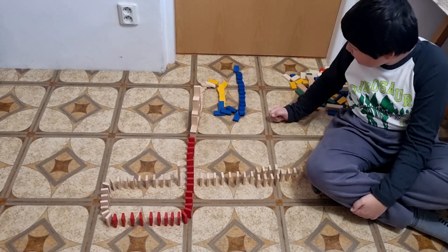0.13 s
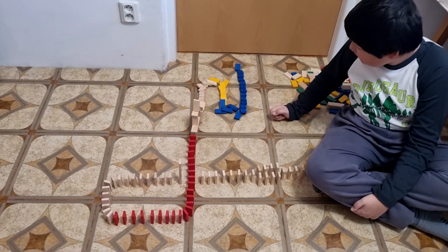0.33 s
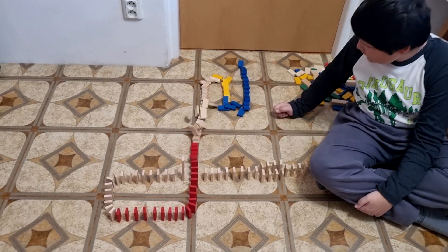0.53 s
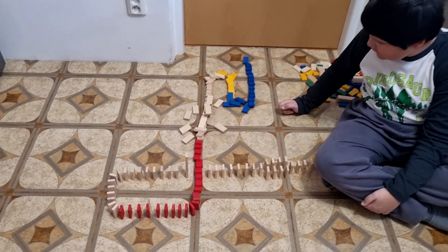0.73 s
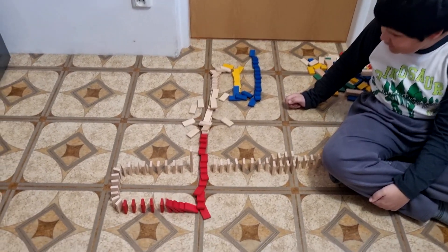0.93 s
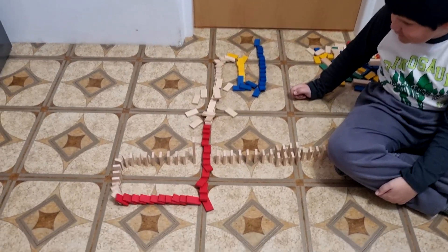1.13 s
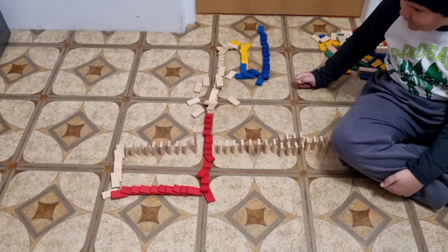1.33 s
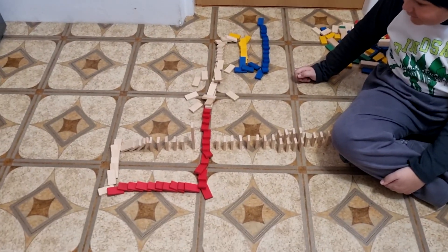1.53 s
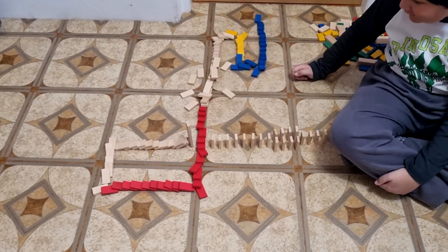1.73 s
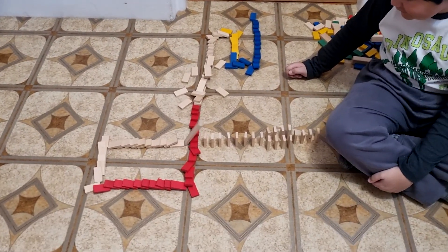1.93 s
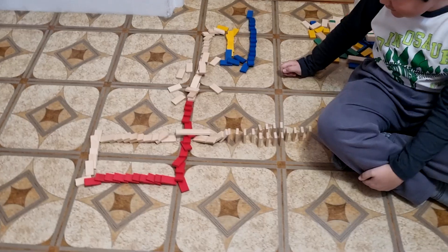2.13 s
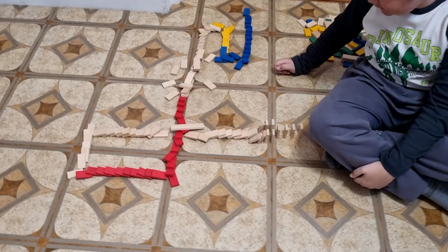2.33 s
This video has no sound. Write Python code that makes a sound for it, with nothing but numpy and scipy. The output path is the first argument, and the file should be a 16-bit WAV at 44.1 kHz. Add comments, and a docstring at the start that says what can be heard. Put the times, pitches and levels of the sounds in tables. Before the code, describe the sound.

Wooden dominoes fall in a fast, uneven clatter on a tiled floor; light ticks, a loud collapse near half a second, then softer clicks thinning out. Small hard room, stereo microphones above, faint low hush.

```python
"""A running clatter follows a chain of wooden dominoes toppling across a tiled floor in a small, hard room.
A stack collapses early on; single pieces slap the tiles, rattle and now and then ring freely.
Each contact is a noise crack with tiny bounces, filtered by the modes of a piece; free rings are dying sines.
A gliding resonator makes the floor boom and decaying noise makes the room, over a quiet, low hush.
Two spaced microphones hear it from above."""
import sys
import numpy as np
from scipy import signal
from scipy.fft import rfft, irfft
from scipy.io import wavfile

SR = 44100
rng = np.random.default_rng(int(sys.argv[2]) if len(sys.argv) > 2 else 0)


def bounce(signal):
    """Save signal as a 16-bit WAV file at the path given by the first command-line argument."""
    frames = np.transpose(np.atleast_2d(signal))
    limited = np.clip(frames, -1, 1)
    pcm = np.round(limited * 32767).astype(np.int16)
    wavfile.write(sys.argv[1], SR, pcm)


N = 109323
LEAD_IN_S = 0.1  # rendered ahead of the output, then cut
SIZE = 4096  # samples
T, HZ = np.arange(SIZE) / SR, np.fft.rfftfreq(SIZE, 1 / SR)
MIC_GAP_M, SOUND_M_PER_S = 0.28, 343

# Bending modes of a piece. Each row: frequency in Hz, t60 in s, level in dB in an ordinary contact.
PIECE_MODES = [(2812,.13,-30),(6850,.018,-20),(12100,.03,-19)]


def amp(db):
    """Decibels to gain."""
    return 10 ** (np.asarray(db) / 20)


def unit(x):
    """Scales to energy 1."""
    return x / np.sqrt(np.sum(x ** 2, -1, keepdims=True) + 1e-20)


def read(points, hz):
    """Reads a table on a log-frequency axis."""
    f, value = np.transpose(points)
    return np.interp(np.log(hz + 1), np.log(f + 1), value)


def add(mix, s, sound):
    """Adds a sound at time s."""
    start = max(round(s * SR), 0)
    part = mix[..., start:][..., :sound.shape[-1]]
    part += sound[..., :part.shape[-1]]


def colour(x, db):
    """Causal minimum-phase filter with the given gain in dB at each frequency of HZ."""
    log_gain = np.log(amp(np.r_[db, db[-2:0:-1]]))
    min_phase = np.exp(np.conj(signal.hilbert(log_gain)))
    taps = np.fft.ifft(min_phase).real
    return signal.oaconvolve(x, taps[:SIZE // 2])[:len(x)]


def mode(hz, t60_s, t=T):
    """A dying sine of energy 1."""
    return unit(np.sin(2 * np.pi * hz * t) * np.exp(-np.log(1000) * t / t60_s))


def contact(s, db, thud_db, knock_db, clack_db, treble_db, rattle_db, room_db):
    """A crack and a run of tiny bounces excite one piece; how it lands sets the weight of each band."""
    # Centres of thud, knock, clack, click and treble in Hz.
    band_hz = (700, 2200, 3900, 6600, 11500)
    rise_s, crack_s, rattle_s = 0.00037, 0.00088, 0.0043  # time constants
    bounces_per_s, pitch_spread = 1600, 0.0424

    t = T[:SIZE // 4]
    crack_envelope = (1 - np.exp(-t / rise_s)) * np.exp(-t / crack_s)
    crack = unit(rng.standard_normal(len(t)) * crack_envelope)
    impulses = rng.standard_normal(len(t)) * (rng.random(len(t)) < bounces_per_s / SR)
    bounces = unit(impulses * np.exp(-t / rattle_s))
    blow = unit(crack + amp(rattle_db) * bounces)

    body = (t == 0).astype(float)  # the blow itself, then the modes
    pitches = 1 + pitch_spread * rng.standard_normal(len(PIECE_MODES))
    for (hz, t60_s, mode_db), pitch in zip(PIECE_MODES, pitches):
        body += amp(mode_db) * mode(hz * pitch, t60_s, t)

    bands = list(zip(band_hz, (thud_db, knock_db, clack_db, 0, treble_db)))
    spectrum = rfft(blow, SIZE) * rfft(body, SIZE) * amp(db + read(bands, HZ))
    return s, irfft(spectrum)[:SIZE // 2], room_db


def clatter(count=340, scatter_db=2.0, rattle_db=1, room_db=1):
    """Each piece taps the next and slides down it: many soft contacts at uneven times."""
    # Course of the soft contacts. Each row: time in s, mean relative level in dB,
    # then thud, knock, clack and treble in dB against the click.
    course = [(0.0, -31.5, 5, 4.5, 6, -3), (0.25, -36, 12, -1, 5, -12), (0.38, -26.5, 6, 9, 7, 0),
              (0.459, -17.5, 4, -6, -9, -8), (0.52, -66, -2, 0, 3, -4), (0.58, -20, -12, -16, -4, -1),
              (0.68, -20.5, 9.5, 8.5, 1.5, -1.5), (0.8, -22, 0, 1, 0.5, -5.5), (0.88, -28, 8, 8, 2, 0.5),
              (1.0, -37, 0, 2, -5, -8), (1.08, -30, 5.5, -1, 6, -4), (1.17, -27, 6.5, 3.5, 4, -4),
              (1.25, -38.5, 10, 12, -1, -0.5), (1.35, -25.5, 1.5, -2, -4, -5.5), (1.43, -34, 7, 3, -2, -13),
              (1.5, -30.5, 7, 12.5, 5.5, -2), (1.6, -51, 16.5, -2, 12, 0), (1.68, -37.5, 9, 8, -2, 3),
              (1.74, -31, 1, 4, 2, -17), (1.86, -33.5, 6, -4, 1, -12), (1.92, -33, 12, 2.5, 1, 2),
              (1.96, -81, 13, 9, 2, -1), (2.093, -54.5, 24, 15, 11, -6), (2.11, -29.5, 4, 5, -3, -15),
              (2.25, -32, 11, 12, 6, -10.5), (2.36, -37.5, 11.5, 9.5, -9, -10),
              (2.48, -42, 4, 17, -3, -4.5)]
    position = (np.arange(count) + rng.random(count)) / count
    times = position * (N / SR + LEAD_IN_S) - LEAD_IN_S
    at, *columns = np.transpose(course)
    levels, *bands = [np.interp(times, at, column) for column in columns]
    levels = levels + scatter_db * rng.standard_normal(count)
    return [contact(*row, rattle_db, room_db) for row in zip(times, levels, *bands)]


def floor_boom(x):
    """The floor rings at a low pitch that changes as the front moves across it."""
    # Floor resonance. Each row: time in s, frequency in Hz, relative drive in dB.
    resonance = [(0,294,10),(.6,289,10),(.9,292,4),(1.2,311,6),(1.45,189,13.5),(1.7,200,13),(1.95,233.6,9),(2.12,235.5,18),(2.48,229,-3)]
    width_hz = 6.6
    at, *columns = np.transpose(resonance)
    t = np.arange(len(x)) / SR - LEAD_IN_S
    hz, db = [np.interp(t, at, column) for column in columns]
    turn = np.exp(2j * np.pi * np.cumsum(hz) / SR)
    r = np.exp(-np.pi * width_hz / SR)
    # shift the resonance to 0 Hz, smooth with one pole, shift back
    baseband = signal.lfilter([1 - r], [1, -r], amp(db) * x / turn)
    return 2 * (turn * baseband).real


def diffuse(z, hz):
    """Makes two spectra as alike as a diffuse field is at two spaced microphones."""
    same = np.sinc(2 * hz * MIC_GAP_M / SOUND_M_PER_S)
    return np.array([z[0], same * z[0] + np.sqrt(1 - same ** 2) * z[1]])


def room_response(delay_s=0.0013, early_s=0.0092, build_s=0.002, early_db=-3.5, taps_per_s=1000):
    """Early wall reflections and a dense tail whose decay time depends on frequency."""
    # Decay of the tail. Each row: frequency in Hz, t60 in s.
    decay = [(100,0.15),(300,0.42),(1000,0.48),(3500,0.38),(7000,0.36),(14000,0.29)]
    t = np.arange(SR // 2) / SR
    late = np.maximum(t - delay_s, 0)
    hz, at, z = signal.stft(rng.standard_normal((2, len(t))), SR, nperseg=256)
    t60_s = read(decay, hz)[:, None]
    z = diffuse(z, hz[:, None]) * np.exp(-np.log(1000) * at / t60_s)
    noise = signal.istft(z, SR)[1][:, :len(t)]
    tail = unit(noise * (1 - np.exp(-late / build_s)))
    taps = rng.standard_normal(tail.shape) * (rng.random(tail.shape) < taps_per_s / SR)
    early = unit(taps * (late > 0) * np.exp(-late / early_s))
    return tail + amp(early_db) * early


def hush(rms_db=-62.5):
    """Quiet, low room noise: shaped noise, diffuse between the microphones."""
    # Noise spectrum. Each row: frequency in Hz, relative level in dB.
    noise_colour = [(25,-23),(60,-21),(130,3.5),(250,-7),(600,-4.5),(2000,-15),(8000,-14),(16000,-57)]
    hz = np.fft.rfftfreq(N, 1 / SR)
    z = diffuse(rfft(rng.standard_normal((2, N))), hz) * amp(read(noise_colour, hz))
    return amp(rms_db) * np.sqrt(N) * unit(irfft(z, N))


def free_ring(s, pitch, *mode_db, room_db=-1):
    """A piece that bounces clear rings with its bending modes."""
    sound = np.zeros(SIZE)
    for (hz, t60_s, _), db in zip(PIECE_MODES, mode_db):
        sound += amp(db) * mode(hz * pitch, t60_s)
    return s, sound, room_db


def scene(path_count=5, direct_db=12, wet_db=13.5):
    """Contacts reach the microphones directly and by one of several paths through the room."""
    # Loud contacts. Each row: start in s, relative level in dB, thud, knock, clack and treble in dB
    # against the click, rattle in dB against the crack, relative room send in dB.
    hits = [(0.007, -32, -6, 16, 18.5, -9, -19, 0.5), (0.033, -27, -21, 4, -1.5, -11, 0, 2),
            (0.054, -22, -12, -4, -13, -16, 1, 8), (0.065, -26, -11, -5, -13, -11, 14, -2),
            (0.079, -19.5, -22, 1, 3, -11, 21, -5), (0.101, -22.5, 2.5, 1, -16, -10, -11, 6),
            (0.115, -22.5, -3, 10.5, 9, -9, -4, 1), (0.119, -20.5, 1, 10, 9, -10, -3, -11),
            (0.162, -16.5, 4, 5.5, 4.5, -13, -2.5, 0), (0.175, -29, 12, -2, 0, -14, -4, 5.5),
            (0.203, -21, -9, -9, 5.5, -13, 13, 4), (0.221, -28, 8.5, 8, 7.5, -13, 4, 7),
            (0.23, -28, 7, 4, 9, -15, -3, -8), (0.26, -29.5, 3, 14, 19.5, -13, -13, 3.5),
            (0.266, -30, 16.5, 9, 11, -2, 2, 5), (0.2897, -13, 11.5, 8.5, 2.5, -12, 10, 3),
            (0.294, -16, 14, 4, 1, -1, 8, -2), (0.302, -21, 18.5, 11, 10, -12, -4, 2.5),
            (0.347, -29, 17, 7, 13, -5, -15, -2), (0.376, -10, -10, -19, -1, -5.5, 5, 3.5),
            (0.388, -27, -20, -8, -6, 1, 3, 2), (0.4077, -3, -7, -7, -3, 3.5, 4, 3.5),
            (0.4117, -2, -2.5, -1, -15, -7, 2.5, 0.5), (0.4241, -1.5, -16, -14, -10, -5, 16, -5),
            (0.433, -7.5, 2, -21, -2, 7.5, 7.5, 1), (0.445, -5.5, -11, -4, -2, -15, -4, 1),
            (0.456, -6.5, -2, -1, -2.5, 0, 11, 1.5), (0.5473, -6, 0, -1, 9.5, -1.5, -4, 0),
            (0.553, -13.5, 0, -2, -13, -2, -7, 8.5), (0.5715, -8.5, -2.5, -3.5, -6, -2, -2, 4.5),
            (0.597, -5.5, -3.5, -9, 7, -1, 22, 1), (0.605, -8, -1, -2, -1, -4, 12, 4),
            (0.614, -7.5, 3.5, 4, 5, 0, -1, -1.5), (0.621, -9.5, 6, 2.5, -4, -2, 1, -0.5),
            (0.648, -12, 2, 1, 5, -3, -5, -4), (0.658, -28, 17, -9, 11, -5, -10, 7),
            (0.709, -14, 2.5, 5, 2, -4, -10, 5), (0.723, -15.5, 5, -1, 1, -1, 6, -3),
            (0.732, -15, 2, -6, -5, 0, -16, 2.5), (0.771, -21, 8, 6.5, 6, 0, 20, 7.5),
            (0.792, -22.5, -11, -6, 12, 4.5, -4, 6), (0.8, -18, 9.5, 3.5, 0.5, -7, -12, 5),
            (0.818, -29, -4, 2, 2, 6, -16, -10), (0.865, -18.5, 0, -5, 7, -2, 7, 0),
            (0.929, -20, 5, -13, -2, -5, -15, 1), (0.9451, -14, 5.5, 1.5, 1.5, 0.5, 2, 2),
            (0.974, -19.5, -5, 0, 1, -7, 2, -6), (1.0257, -16.5, -16, 3, -13, -11, 11, -2),
            (1.059, -20.5, -6, 3, -0.5, -9, -12, 2), (1.102, -14.5, -3, 0, -7, -11, -6, -1.5),
            (1.126, -18, -8.5, 2, -1, -3, 1, 4), (1.153, -16.5, -7, 1, -7, -8, -8, 1.5),
            (1.16, -26, -7, 9, -3, -2, -20, 1), (1.183, -21.5, -1, -21, 3, -2, -3, 3.5),
            (1.267, -28, 1, -4, 9, -5, -2, 3.5), (1.32, -16.5, -6, -1, -4, -18, 11, 0.5),
            (1.355, -18, -1, 2.5, -5.5, -19, 1, 1), (1.45, -17.5, 6, -4, 9, -8, -12, 2),
            (1.454, -25, 3, 13, -6, 14, 2, 2), (1.4643, -10.5, -4, -1, 0, 0, 2.5, 3),
            (1.504, -23, 1, 5, -7, -1, -11, 2.5), (1.651, -27, 1, 0, 1, -3, 1, -5),
            (1.679, -30, 3.5, -3, -5.5, -6, -11, 10), (1.7123, -23, 4.5, 2, -1, -6, 15, 4.5),
            (1.7709, -14, -4.5, -3, -5, -4, -4, -2.5), (1.8154, -19.5, -8, 8, -1.5, -9, 2.5, 5.5),
            (1.903, -27, 12, 11, -14, 2, 8.5, 0), (2.1036, -23, 11.5, 18, 8, -24, 11, -1),
            (2.113, -30, 5, 15, 0, -12.5, -4, -3), (2.161, -23, 14, 4, 9, -8, -1.5, -5.5),
            (2.204, -34, 1, 7, 18.5, -3, -5.5, 3.5), (2.237, -14, -8, -8, -7, -13, -18, -0.5),
            (2.2755, -15.5, -10, 0, 0, -5.5, -15, -8), (2.296, -23.5, 8, -2, -5, -11, 11, 6),
            (2.331, -32.5, 21.5, 15, 18, 3, 11, -1), (2.352, -17, 4.5, 4.5, -1, -6, -7.5, 2),
            (2.385, -26, 11, 1, 5.5, -7.5, 0, 5), (2.443, -31.5, 10, 4, 4.5, -5, -8, 2.5),
            (2.465, -29.5, 5, 0, 6, -5, 15, 1.5)]
    # Free rings. Each row: start in s, pitch factor, relative level of each of three modes in dB.
    rings = [(1.7125,1,-55,-35,-21),(1.7714,.995,-50,-28,-17),(1.8165,.995,-22,-33,-31),(2.108,1,-20.5,-33,-55),(2.165,1,-28,-44,-55)]
    # Place of the falling front. Each row: time in s, lag of the left microphone in ms.
    place = [(0,.2),(.55,.2),(.8,0),(1.02,-.32),(1.45,-.34),(1.77,.09),(2.1,.18),(2.48,.25)]
    # Colour of a contact. Each row: frequency in Hz, gain in dB.
    wood = [(30,-52),(70,-24.5),(120,-28.5),(180,-12),(260,-4.5),(400,-11),(800,-7),(1300,-3.5),(2200,-1),(3300,2),(5200,0.5),(7400,4),(8700,-6.5),(11000,-10.5),(12400,0.5),(14800,-9),(15600,-19)]
    # Colour of the room sound. Each row: frequency in Hz, gain in dB.
    room_colour = [(100,-8),(400,5.5),(1500,1.5),(4000,1.5),(8000,1.5),(14000,-1.5)]

    rooms = [room_response() for _ in range(path_count)]
    quiet = hush()
    sounds = clatter() + [contact(*row) for row in hits] + [free_ring(*row) for row in rings]

    length = N + round(LEAD_IN_S * SR)
    direct, sends = np.zeros((2, length)), np.zeros((path_count, length))
    for k, (s, sound, room_db) in enumerate(sounds):
        lag_s = np.interp(s, *np.transpose(place)) / 1000
        add(direct[0], LEAD_IN_S + s + lag_s / 2, sound)
        add(direct[1], LEAD_IN_S + s - lag_s / 2, sound)
        add(sends[k % path_count], LEAD_IN_S + s, amp(room_db) * sound)

    wet = np.zeros((2, length))
    for send, room in zip(sends, rooms):
        wet += signal.fftconvolve(send[None], room, axes=1)[:, :length]
    wet += floor_boom(sends.sum(0))
    wet = np.array([colour(x, read(room_colour, HZ)) for x in wet])

    mix = amp(direct_db) * direct + amp(wet_db) * wet
    return np.array([colour(x, read(wood, HZ))[-N:] for x in mix]) + quiet


def record(dry, ceiling=0.8, edge_hz=15900):
    """The right microphone is the brighter one; the tallest peaks are rounded off; then the band limit."""
    # Microphone balance. Each row: frequency in Hz, left minus right in dB.
    balance = [(100,-2.5),(500,-0.2),(1300,1),(2000,-0.5),(2700,-4),(4000,-7),(4700,-5.5),(5300,-0.5),(7000,-5),(8200,-8),(10000,-1.5),(11000,-11),(12600,-3),(15000,-3)]
    half_db = read(balance, HZ) / 2
    both = np.array([colour(dry[0], half_db), colour(dry[1], -half_db)])
    both = both / (1 + (both / ceiling) ** 4) ** 0.25
    low_pass = signal.firwin(301, edge_hz, window=("kaiser", 8), fs=SR)
    return signal.oaconvolve(both, low_pass[None], "same")


dry = scene()
out = record(dry)
bounce(out)
```